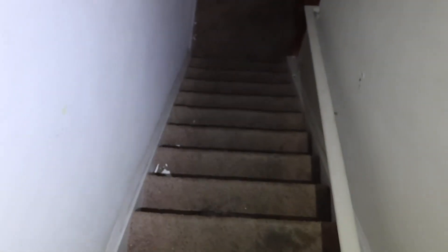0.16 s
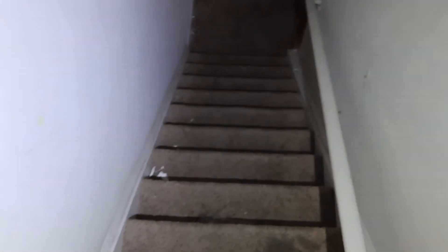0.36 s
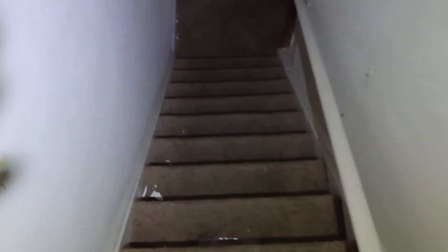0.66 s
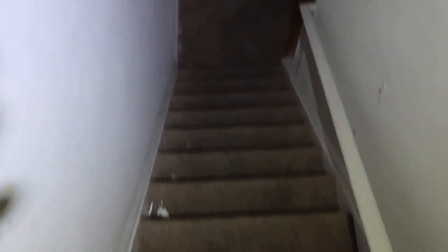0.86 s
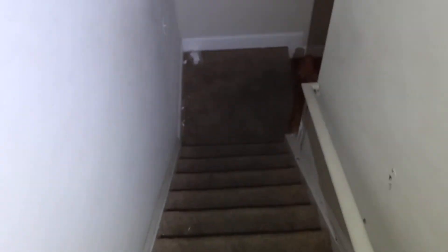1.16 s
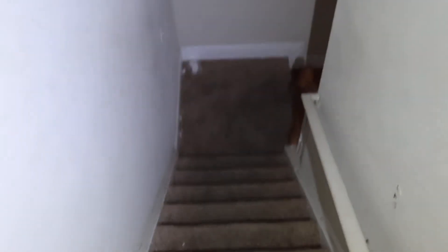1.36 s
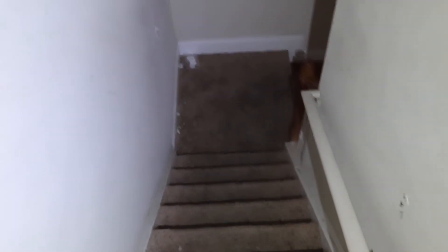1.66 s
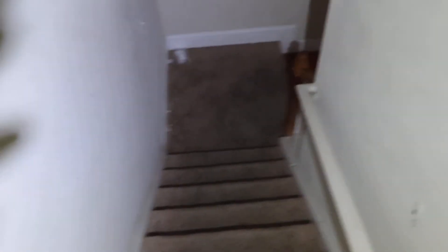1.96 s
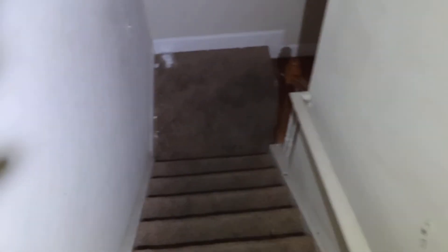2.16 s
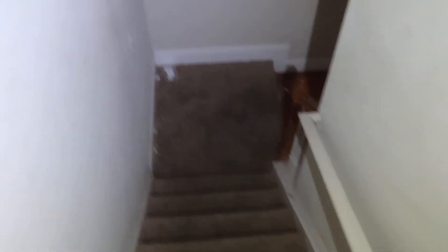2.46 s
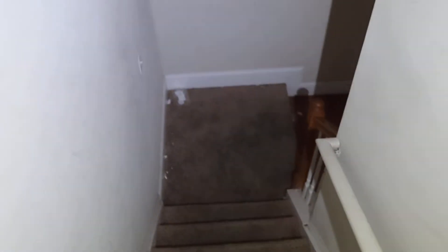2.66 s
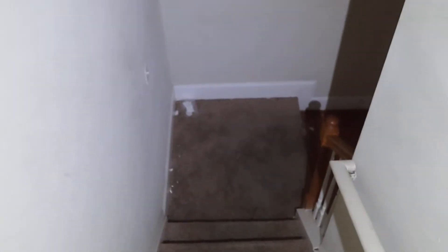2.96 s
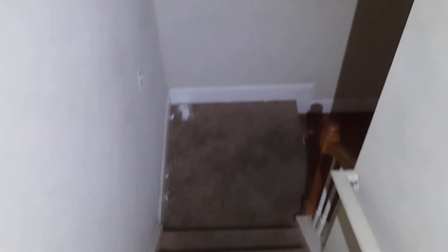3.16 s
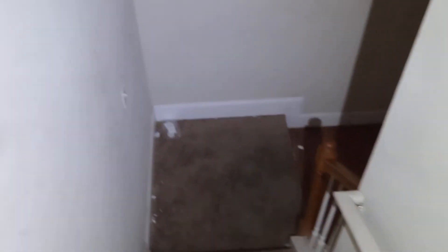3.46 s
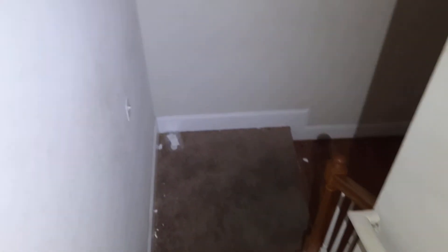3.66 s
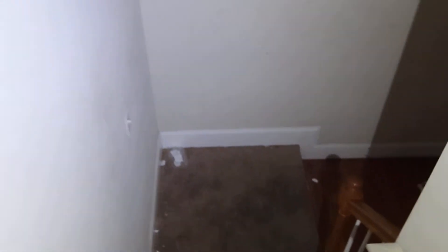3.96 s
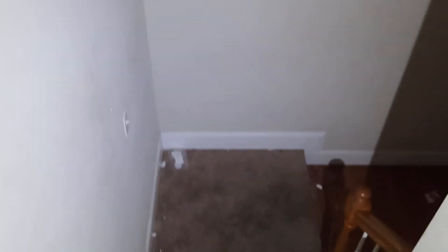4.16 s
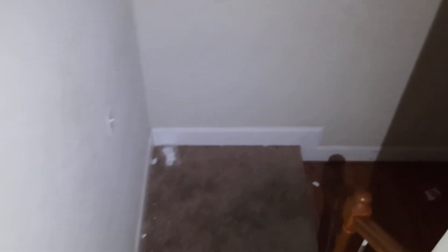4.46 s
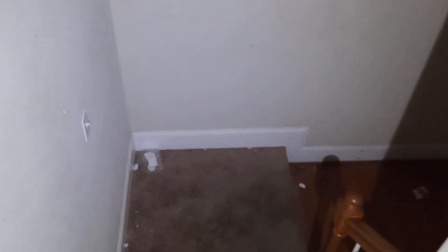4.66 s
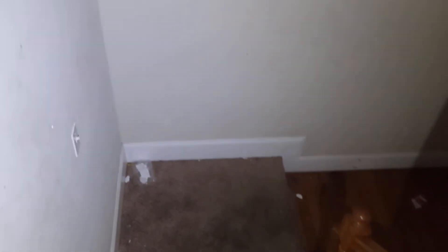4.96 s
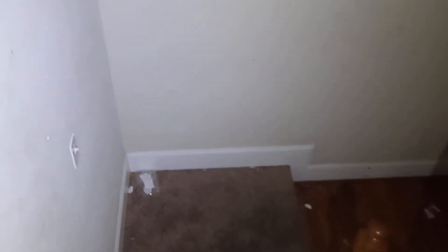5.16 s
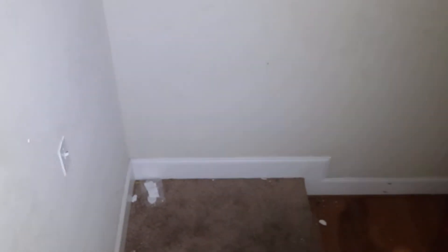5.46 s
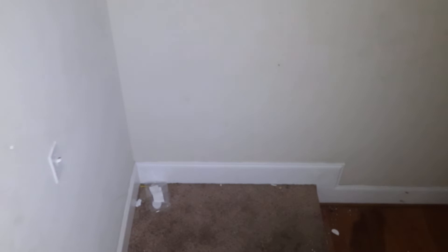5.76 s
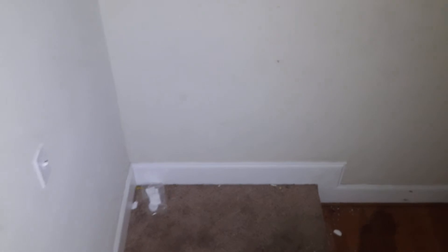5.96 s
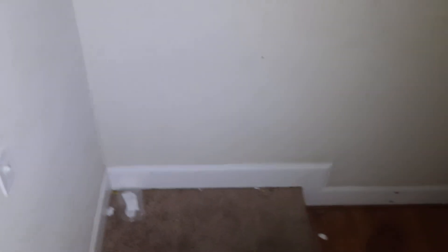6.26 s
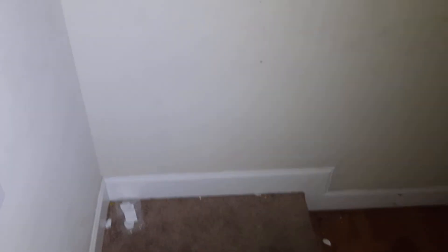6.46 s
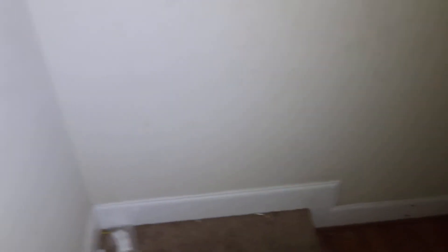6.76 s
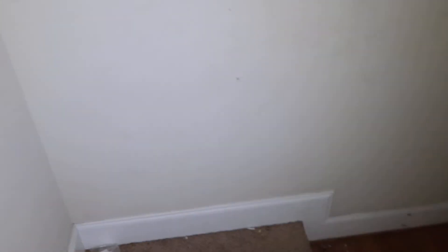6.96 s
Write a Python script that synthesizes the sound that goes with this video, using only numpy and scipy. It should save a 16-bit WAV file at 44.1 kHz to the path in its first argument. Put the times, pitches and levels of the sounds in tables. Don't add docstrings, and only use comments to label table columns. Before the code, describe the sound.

Close, chest-height small camera sound of a walker descending stairs. Over quiet room air and hiss, each step is a cluster: low soft thud, hollow board knock, light toe tap, then a brushing sole. Cloth swishes between steps, with tiny high key ticks on alternate strides. The thuds grow deeper further down, and a big booming footfall at about six seconds stands out, followed by soft rolling scuffs. Short bare-walled reverberation.

```python
import sys
import numpy as np
from scipy import signal
from scipy.fft import rfft, irfft, next_fast_len
from scipy.io import wavfile

SR = 44100
rng = np.random.default_rng(int(sys.argv[2]) if len(sys.argv) > 2 else 0)


def gain_from_db(level_db):
    decades = np.asarray(level_db, float) / 20
    return 10 ** decades


def dump_mix(stems):
    frames = np.atleast_2d(stems).T
    limited = np.clip(frames, -1, 1)
    pcm = np.round(limited * 32767).astype(np.int16)
    wavfile.write(sys.argv[1], SR, pcm)


N = 313110


def rms_one(x):
    return x / np.sqrt(np.mean(x ** 2) + 1e-20)


def colour(x, points):
    hz = np.maximum(np.fft.rfftfreq(x.shape[-1], 1 / SR), 1)
    table_hz, table_db = np.transpose(points)
    gain = gain_from_db(np.interp(np.log(hz), np.log(table_hz), table_db))
    return irfft(rfft(x) * gain, x.shape[-1])


def drift(rate_hz):
    r = np.exp(-80 * np.pi * rate_hz / SR)
    noise = rng.standard_normal(N // 40 + 2002)
    slow = signal.lfilter([1], [1, -2 * r, r * r], noise)[2000:]
    return np.interp(np.arange(N) / 40, np.arange(len(slow)), rms_one(slow))


def ring(clicks, hz, t60_s):
    r = gain_from_db(-60 / (t60_s * SR))
    w = 2 * np.pi * hz / SR
    return signal.lfilter([0, np.sin(w)], [1, -2 * r * np.cos(w), r * r], clicks + 1e-18)


def resonate(x, hz, width_hz):
    r = np.exp(-np.pi * width_hz / SR)
    w = 2 * np.pi * hz / SR
    return (1 - r * r) / 2 * signal.lfilter([1, 0, -1], [1, -2 * r * np.cos(w), r * r], x)


def swells(s, top_db, rise_s, fall_s, rounding):
    t = np.arange(0, N + 40, 40) / SR
    s, top_db, rise_s, fall_s = (np.reshape(c, (-1, 1)) for c in (s, top_db, rise_s, fall_s))
    under = np.where(t < s, (s - t) / rise_s, (t - s) / fall_s)
    power = np.sum(gain_from_db(top_db - 20 * under ** rounding) ** 2, axis=0)
    return np.interp(np.arange(N) / SR, t, np.sqrt(power))


# frequency in Hz, level in dB.
HUSH = [(15, -35), (25, -2.5), (80, 1), (152, -2), (306, -5), (496, -5.5), (667, -9), (2360, -17),
        (4510, -22), (13200, -40), (15600, -46)]
# frequency in Hz, side minus mid in dB.
HUSH_SIDE = [(60, -25), (110, -11), (200, -2.5), (380, -0.5), (700, -4.5), (1290, -2.5), (2380, -5),
             (4400, -5), (8120, -4), (15000, 0)]
HUSH_DB = -48.5


def hush():
    mid, side = colour(rng.standard_normal((2, N)), HUSH)
    gain = gain_from_db(HUSH_DB + 0.13 * drift(4.7))
    return gain * np.array([mid, colour(side, HUSH_SIDE)]) / np.std(mid)


# frequency in Hz, side minus mid in dB.
NEAR_SIDE = [(60, -44), (110, -70), (200, -26), (380, -25), (700, -19), (1290, -14.5), (2380, -10),
             (4400, -5), (8120, 4), (15000, 10)]
CLUMP_DB, CLUMPS_PER_S = 0.9, 35


def friction(spectrum, per_s, spread_db, patchy_db):
    uneven = gain_from_db(spread_db * np.minimum(rng.exponential(1, (2, N)), 2))
    slips = (rng.random((2, N)) < per_s / SR) * uneven * rng.standard_normal((2, N))
    mid, side = colour(slips, spectrum)
    patches = gain_from_db(patchy_db * drift(12.6) + CLUMP_DB * drift(CLUMPS_PER_S))
    return np.array([mid, colour(side, NEAR_SIDE)]) / np.sqrt(np.mean(mid ** 2)) * patches


WELL_T60_S, WALL_CUT_HZ, WELL_DB = 0.38, 3600, -12.5
WELL_LOW_HZ = 120


def stairwell(blows):
    low_cut = signal.butter(2, WELL_LOW_HZ, "high", fs=SR, output="sos")
    size = next_fast_len(N + SR)
    spectrum = rfft(signal.sosfilt(low_cut, blows), size)
    w = 2 * np.pi * np.arange(size // 2 + 1) / size
    dull = 1 / (1 + 1j * w * SR / (2 * np.pi * WALL_CUT_HZ))
    echoes = np.zeros((2, size // 2 + 1), complex)
    for k, lag in enumerate(rng.uniform(.011, .04, 16) * SR):
        loop = gain_from_db(-60 * lag / SR / WELL_T60_S) * dull * np.exp(-1j * w * lag)
        echoes[k % 2] += (-1) ** (k // 2) * loop / (1 - loop)
    mid, side = irfft(echoes * spectrum, size)[:, :N]
    return gain_from_db(WELL_DB) * np.array([mid, gain_from_db(-4) * colour(side, NEAR_SIDE)])


SEAM_S, SEAM_DB, SEAM_RISE_S, SEAM_FALL_S = 2.24, -57.5, 0.14, 0.09
SEAM_HZ, SEAM_SINK_HZ_PER_S, SEAM_WIDTH_HZ = 4920, 7300, 300


def seam():
    hz = np.clip(SEAM_HZ - SEAM_SINK_HZ_PER_S * (np.arange(N) / SR - SEAM_S), 1000, 9000)
    narrow = signal.butter(2, SEAM_WIDTH_HZ / 2, fs=SR, output="sos")
    fuzz = signal.sosfilt(narrow, rng.standard_normal((2, N)))
    hiss = rms_one(fuzz * np.sin(2 * np.pi * np.cumsum(hz) / SR))
    return swells(SEAM_S, SEAM_DB, SEAM_RISE_S, SEAM_FALL_S, 3.0) * hiss


BRUSH_ROUNDING, LOAD_ROUNDING = 1.11, 0.99
SWING_FALL_SHARE = 0.87
# top in seconds, sole in dB, cloth in dB, keys in dB, length in seconds.
SWINGS = [
    (0.857, -38.5, -36.5, -64, 0.12),
    (2.241, -52, -50, -57.5, 0.15),
    (3.571, -34, -41, -51, 0.078),
    (4.879, -36, -38.5, -51.5, 0.077),
    (6.352, -38, -45.5, -54.5, 0.13),
]


def swings():
    s, *levels_db, length_s = np.transpose(SWINGS)
    return [swells(s, db, length_s, SWING_FALL_SHARE * length_s, BRUSH_ROUNDING) for db in levels_db]


# top in seconds, level in dB, rise in seconds, fall in seconds.
JOLTS = [
    (0.68, -60, 0.04, 0.14),
    (0.78, -53, 0.025, .2),
    (0.85, -55, 0.087, 0.15),
    (2.088, -57, 0.028, 0.089),
    (3.33, -75, 0.068, .15),
    (3.52, -63, 0.14, .1),
    (4.71, -67, 0.13, 0.26),
    (6.23, -65, 0.062, 0.23),
    (6.372, -48.5, 0.028, 0.017),
]
# frequency in Hz, level in dB, t60 in seconds.
KEYS = [(6470, -7, 0.036), (7700, -19, .025), (10080, 1, 0.027), (10200, -12, .025), (10400, -20, .03),
        (11200, 1, 0.02), (11600, 3, 0.0083), (12500, -13, .02), (13740, -14, .025), (14270, -6, .03),
        (14400, -12, .025), (14750, 0, .02), (15150, 1, 0.014)]
# frequency in Hz, width in Hz, level in dB.
POCKET = [(1910, 160, -17), (2245, 110, -5.5), (2680, 64, -7), (5000, 280, -15), (5370, 130, -20),
          (6450, 380, -18)]
POCKET_UNDER_CLOTH_DB = -12.5
KEY_FOLD_DB = 0.3


def keys():
    _, swing_cloth, swing_keys = swings()
    jolts = swells(*np.transpose(JOLTS), LOAD_ROUNDING)
    jostle = np.hypot(swing_keys, jolts)
    drag = np.hypot(gain_from_db(POCKET_UNDER_CLOTH_DB) * swing_cloth, jolts)
    out = np.zeros((2, N))
    ticks = (rng.random((2, N)) < 7000 / SR) * rng.standard_normal((2, N)) * jostle
    struck = rng.integers(0, len(KEYS), (2, N))
    for k, (hz, level_db, t60_s) in enumerate(KEYS):
        gain = gain_from_db(level_db + KEY_FOLD_DB * drift(7.0))
        out += gain * ring(ticks * (struck == k), hz, t60_s) * gain_from_db([[-8.0], [3.0]])
    rub = rng.standard_normal((2, N)) * drag
    for hz, width_hz, level_db in POCKET:
        fold = gain_from_db(3.5 * drift(12))
        ports = gain_from_db([[0], [-9 + 6 * np.log2(hz / 2200)]])
        out += fold * gain_from_db(level_db + 27.0) * resonate(rub, hz, width_hz) * ports
    return out


# frequency in Hz, level in dB per Hz.
RUMBLE = [(25, 3.5), (50, -6), (70, 6.5), (125, 3), (190, 3), (260, 1), (400, -27), (2000, -90)]
SOLE = [(120, -18), (250, -6.5), (370, 0.5), (480, -1.5), (700, -6), (1200, -12), (2000, -23), (3500, -86),
        (9000, -71)]
CLOTH = [(700, -2), (1300, 1.5), (1800, 0.5), (2300, 2.5), (3300, -4.5), (5000, -11), (7000, -40),
         (10000, -25.5), (16000, -36)]
PILE = [(4000, -1), (6500, 0), (8500, -8.5), (11000, -19.5), (14000, -16.5), (16000, -18)]
# top in seconds, sole in dB, cloth in dB rel sole, rise in seconds,
# fall in seconds.
SCUFFS = [(0.0, -37, -21, 0.045, 0.13), (0.42, -38, -6.5, 0.058, 0.27), (0.63, -37.5, -5, 0.14, 0.41),
          (1.01, -42, -6.5, 0.37, 0.3), (1.16, -44.5, 1, 0.094, 0.55), (1.26, -33.5, -9.5, 0.17, 0.23),
          (1.764, -34, -9.5, 0.037, 0.061), (2.1, -39, -3.5, 0.34, 0.37), (2.45, -46.5, -12, 0.14, 0.44),
          (2.66, -37, -4.5, 0.24, 0.22), (3.26, -49, -5, 0.067, 0.2), (3.41, -44.5, 2, 0.36, 0.34),
          (3.93, -41.5, -2, 0.17, 0.35), (4.08, -40, -8.5, 0.34, 0.11), (4.33, -52.5, -1.5, 0.066, 0.35),
          (4.7, -43.5, -2.5, 0.38, 0.61), (5.1, -45, -8.5, 0.11, 0.23), (5.32, -43, -3, 0.19, 0.27),
          (5.46, -43.5, -8, 0.42, 0.21), (5.98, -55.5, 5, 0.08, .2), (6.19, -42, -8, 0.31, 0.79),
          (6.5, -49, -5.5, 0.068, 1), (6.76, -37.5, -6.5, 0.14, 0.17), (6.87, -43, -3, 0.17, .08)]
# top in seconds, rumble in dB, rise in seconds, fall in seconds.
LOADS = [(0.0, -36, .1, 0.18), (0.47, -38, 0.072, 0.23), (0.81, -46, 0.1, 0.14), (1.01, -50, .5, .5),
         (1.25, -40, 0.5, 0.16), (1.56, -45.5, 0.026, 0.2), (2.48, -47.5, 0.39, .5),
         (3.0, -51, 0.13, 0.094), (2.63, -38.5, 0.13, 0.18), (2.77, -41.5, 0.34, 0.1),
         (3.34, -34, 0.11, 0.14), (3.56, -41.5, 0.11, 0.067), (3.95, -40, 0.24, 0.097),
         (4.17, -46, .2, .15), (4.63, -44.5, 0.43, 0.31), (4.75, -38, 0.02, 0.12),
         (5.03, -46.5, 0.097, 0.18), (5.479, -40, 0.39, 0.19), (6.0, -51, 0.18, .3),
         (6.37, -41.5, 0.18, 0.1), (6.56, -43.5, 0.15, 0.12), (6.77, -36.5, 0.18, 0.27)]
LOAD_REST_DB = -62
PILE_UNDER_CLOTH_DB, PILE_OVER_KEYS_DB = -12, 5


def stride():
    s, sole_db, cloth_rel_db, rise_s, fall_s = np.transpose(SCUFFS)
    sole = swells(s, sole_db, rise_s, fall_s, BRUSH_ROUNDING)
    cloth = swells(s, sole_db + cloth_rel_db, rise_s, fall_s, BRUSH_ROUNDING)
    swing_sole, swing_cloth, swing_keys = swings()
    load = np.hypot(gain_from_db(LOAD_REST_DB), swells(*np.transpose(LOADS), LOAD_ROUNDING))
    pile = np.hypot(gain_from_db(PILE_UNDER_CLOTH_DB) * cloth, gain_from_db(PILE_OVER_KEYS_DB) * swing_keys)
    return (load * friction(RUMBLE, per_s=800, spread_db=0.5, patchy_db=1.6)
            + np.hypot(sole, swing_sole) * friction(SOLE, per_s=3000, spread_db=2.5, patchy_db=2.5)
            + np.hypot(cloth, swing_cloth) * friction(CLOTH, per_s=6000, spread_db=1.5, patchy_db=1.5)
            + pile * gain_from_db(1.5) * friction(PILE, per_s=30000, spread_db=0.5, patchy_db=1.5))


# start in seconds, peak in dB, low boards in dB rel, rattle t60 in seconds.
SLAPS = [(0.115, -48, 4.5, 0.29), (0.405, -22, -2.5, 0.1), (0.418, -30, 1, 0.12),
         (0.454, -33.5, -5.5, 0.21), (0.455, -26, -12, 0.034), (1.227, -24, -7, 0.15),
         (1.242, -27, -2, 0.11), (1.625, -36.5, -8, 0.028), (1.726, -41, 8.5, 0.055),
         (1.75, -24.5, -5, 0.094), (1.76, -25, -6, 0.12), (2.006, -26.5, 3, 0.17), (2.019, -32, -2, 0.083),
         (2.094, -24, -12, 0.082), (2.678, -29.5, 2, 0.34), (3.13, -47, 10, 0.1), (3.312, -26, -3.5, 0.11),
         (3.881, -36, 4, 0.17), (4.002, -24.5, -2.5, 0.23), (4.019, -33.5, 10.5, 0.099),
         (4.397, -39.5, 1, 0.068), (4.658, -28.5, -5, 0.024), (5.121, -43, 2, 0.08), (5.274, -39, -3, 0.26),
         (6.058, -34.5, 4.5, 0.2), (6.084, -40, 3, 0.11), (6.159, -40, 8, 0.27)]
# start in seconds, peak in dB, crack in dB rel,
# rattle t60 in seconds.
TAPS = [(0.193, -36.5, -9.5, 0.08), (0.597, -25.5, -3.5, 0.09), (0.679, -26.5, -11.5, 0.14),
        (0.849, -26, -6, 0.25), (1.031, -36.5, -9, 0.19), (1.06, -32.5, -5, 0.089),
        (2.22, -35.5, -22, 0.19), (3.43, -40, -20, 0.1), (3.566, -25, -15, 0.14), (4.298, -37.5, -9, 0.23),
        (4.53, -38, -17, 0.31), (4.641, -18, -18, 0.037), (4.86, -22, -15, 0.058), (4.898, -42, -15, 0.11),
        (5.399, -27.5, -16, 0.14), (5.965, -50, 0, .18), (6.349, -25, -11.5, 0.071),
        (6.558, -39, -21, 0.19), (6.726, -30, -11, 0.14)]
# start in seconds, peak in dB, low boards in dB rel,
# crack in dB rel, rattle t60 in seconds.
ROLLS = [(0.831, -27, -17, -8, 0.14), (0.867, -34, -15, -13, 0.087), (2.08, -23, 5, -5, 0.051),
         (3.321, -29, -15, 4.5, 0.037), (3.396, -23.5, -5, -12, .13), (3.542, -27, -17, -8, 0.15),
         (3.774, -33.5, -5, -6.5, 0.33), (4.04, -34, 1, -4, .08), (4.129, -37, -6, -19, 0.092),
         (4.851, -30, -10, -12, .08), (6.136, -32.5, 5, -25, 0.12), (6.329, -32, -12, -14, .1),
         (6.75, -39, 1, -9, .15), (6.786, -30, -2, -12, 0.11), (6.819, -33, 2, -12, 0.11),
         (6.858, -31.5, -7, -5, .12), (4.004, -29, -12, -2.5, 0.05), (2.135, -33, -8, -4, .05),
         (0.882, -39, -15, -7, 0.053), (4.7, -43, -15, 3, 0.046), (4.5, -44, -15, 5, 0.07)]
# frequency in Hz, width in Hz, level in dB.
BOARDS = [(178.3, 29.5, 10), (280, 23.4, 9.5), (364, 51, 7), (462, 45, 7), (577, 41, 3.5), (754, 133, 4),
          (1070, 167, 0), (1390, 390, 2.5), (1734, 426, 0), (2180, 2000, -16.5)]
CRACK_DB, CRACK_DB_PER_S = -2.5, -1.5
TAP_LOW_DB = -23
SLAP_RISE_S, TAP_RISE_S, ROLL_RISE_S = .00003, .001, .004
BOARD_PITCH_SPREAD, BOARD_SPREAD_DB = .05, 1.2


def knocks():
    rows = [(s, db, low, CRACK_DB + CRACK_DB_PER_S * s, t60, SLAP_RISE_S) for s, db, low, t60 in SLAPS]
    rows += [(s, db, TAP_LOW_DB, crack, t60, TAP_RISE_S) for s, db, crack, t60 in TAPS]
    rows += [(*row, ROLL_RISE_S) for row in ROLLS]
    out, length = np.zeros(N + SR), SR // 3
    shape = (len(rows), length)
    contacts = rng.standard_normal(shape) * gain_from_db(3.3 * rng.standard_normal(shape))
    contacts[:len(SLAPS), :14] += 2.6 * np.hanning(14)
    chance = rng.standard_normal((len(rows), 2, len(BOARDS)))
    t = np.arange(length) / SR
    edge = signal.butter(1, [800, 2600], "band", fs=SR, output="sos")
    for row, contact, (detune, uneven) in zip(rows, contacts, chance):
        s, peak_db, low_db, crack_db, t60_s, rise_s = row
        burst = contact * gain_from_db(peak_db - 60 * t / t60_s) * (1 - np.exp(-t / rise_s)) + 1e-18
        sound = gain_from_db(crack_db + 5.5) * signal.sosfilt(edge, burst)
        for k, (hz, width_hz, level_db) in enumerate(BOARDS):
            share_db = (low_db, 0, crack_db)[np.searchsorted([400, 750], hz)]
            gain = gain_from_db(level_db + share_db + 9.0 + BOARD_SPREAD_DB * uneven[k])
            board_hz = hz * (1 + BOARD_PITCH_SPREAD * detune[k])
            sound += (-1) ** k * gain * resonate(burst, board_hz, width_hz)
        at = round(s * SR)
        out[at:at + length] += sound
    return signal.sosfilt(signal.butter(2, 4200, fs=SR, output="sos"), out[:N])


# start in seconds, peak in dB, tread pitch in Hz, t60 in seconds.
THUDS = [(0.404, -21, 120, 0.16), (0.453, -19.5, 130.3, 0.14), (0.712, -26, 134, 0.14),
         (0.742, -26, 119, 0.14), (0.757, -25, 122, 0.12), (1.141, -27, 91.5, 0.12), (1.23, -15, 114, 0.04),
         (1.254, -20.5, 118, 0.14), (1.732, -22.5, 119.7, 0.11), (1.752, -23, 119, 0.19),
         (1.965, -22.5, 108.2, 0.39), (2.006, -18, 104.7, 0.2), (2.069, -16, 116, 0.071),
         (2.571, -28, 83.4, .16), (2.648, -29.5, 120, 0.66), (3.128, -22.5, 125, 0.04),
         (3.26, -25.5, 79.5, 0.16), (3.318, -22, 61.6, 0.12), (3.389, -21.5, 143, 0.12),
         (3.889, -24, 61.3, 0.3), (3.941, -21, 57.4, 0.14), (4.395, -26.5, 87, 0.084),
         (4.548, -19, 70, 0.28), (4.595, -19.5, 56.6, .11), (5.241, -27.5, 62.5, 0.37),
         (5.286, -31.5, 57.6, 0.19), (6.059, -8.5, 75.4, 0.093), (6.077, -5, 98.4, 0.071),
         (6.105, -11.5, 93, 0.1), (6.122, -19, 58, 0.073), (6.158, -25, 105, 0.11), (6.232, -32, 90, .1),
         (6.186, -31, 50, .15), (6.363, -33.5, 65, 0.15), (3.908, -26, 72, .12), (4.164, -32, 94, 0.17),
         (6.696, -23, 49.6, 0.24), (6.779, -19, 58, 0.14)]
# start in seconds, peak in dB, pitch in Hz, t60 in seconds.
BUMPS = [(0.453, -30, 143, 0.11), (1.23, -16, 143, 0.037), (1.252, -23, 178.4, 0.2),
         (1.319, -26, 124, 0.13), (1.53, -41, 280, 0.25), (1.751, -21.5, 179, 0.22),
         (2.006, -22, 178.4, 0.21), (2.037, -23, 130.4, 0.19), (2.649, -32.5, 147, 0.36),
         (3.551, -32, 133.5, 0.22), (3.922, -27, 130, 0.084), (4.019, -19, 152, 0.097),
         (4.017, -16, 206, 0.069), (4.06, -27.5, 199, 0.15), (4.546, -30, 181, 0.13),
         (4.849, -26, 205, 0.1), (5.288, -30, 189, 0.11), (6.105, -19, 143, 0.047), (6.138, -21, 168, 0.12),
         (6.175, -27.5, 175, .15), (6.514, -35, 162, 0.17), (6.737, -27.5, 73.4, .22),
         (6.735, -28.5, 165, 0.16)]
RISER_HZ, RISER_DB, RISER_T60_S = 143, -10.5, 0.082


def thuds():
    out, length = np.zeros(N + SR), SR // 2
    push = np.zeros(length)
    push[:110] = np.hanning(110) / 55
    riser = gain_from_db(RISER_DB) * ring(push, RISER_HZ, RISER_T60_S)
    for s, peak_db, tread_hz, t60_s in THUDS:
        at = round(s * SR)
        out[at:at + length] += gain_from_db(peak_db - 1.0) * (riser - ring(push, tread_hz, t60_s))
    for s, peak_db, hz, t60_s in BUMPS:
        at = round(s * SR)
        out[at:at + length] += gain_from_db(peak_db - 0.5) * ring(push, hz, t60_s)
    return signal.sosfilt(signal.butter(2, 32, "high", fs=SR, output="sos"), out[:N])


def scene():
    blows = thuds() + knocks()
    direct = blows * [[1], [0]]
    mid, side = hush() + stairwell(blows) + seam() + keys() + stride() + direct
    return np.array([mid + side, mid - side])


def top_cut(x):
    return signal.sosfilt(signal.butter(12, 15710, fs=SR, output="sos"), x)


def record(dry):
    mix = 0.38 * np.tanh(dry / 0.42) + 0.00061
    return top_cut(mix)


dry = scene()
out = record(dry)
dump_mix(out)
```